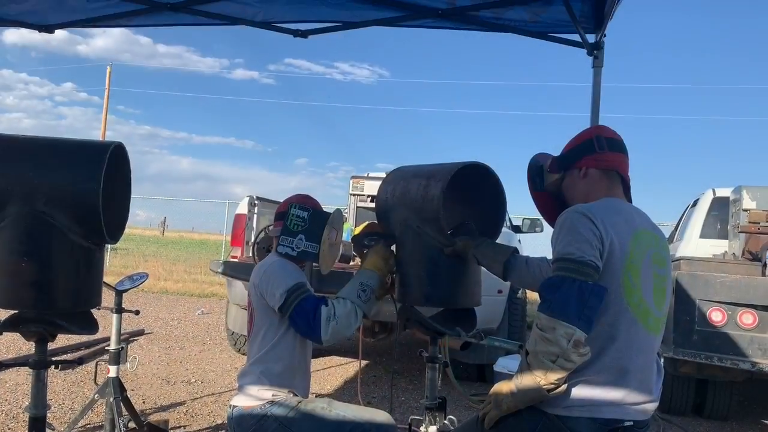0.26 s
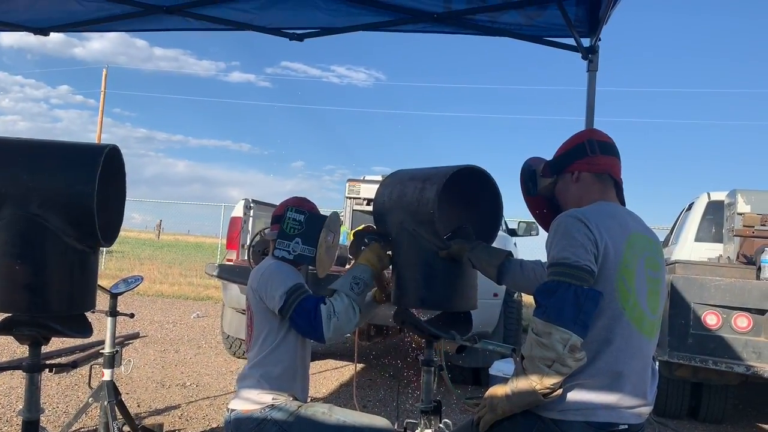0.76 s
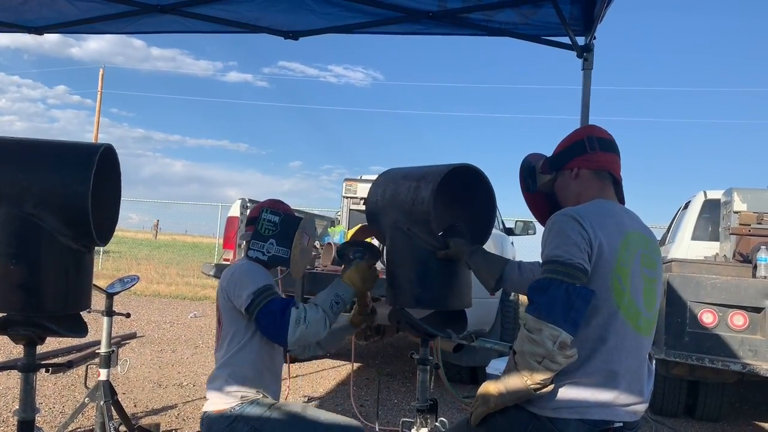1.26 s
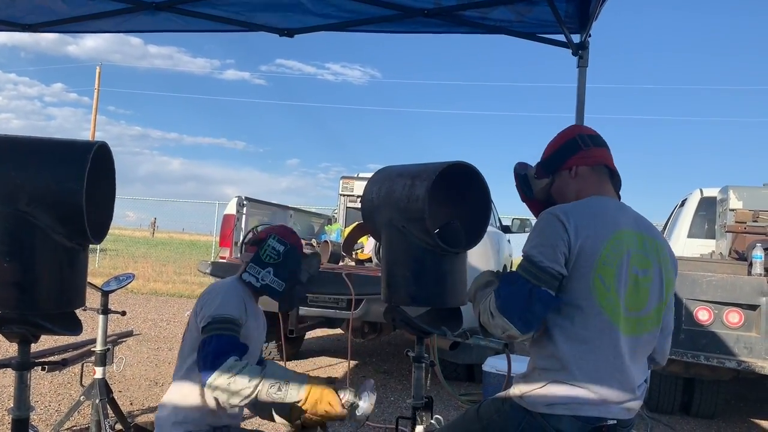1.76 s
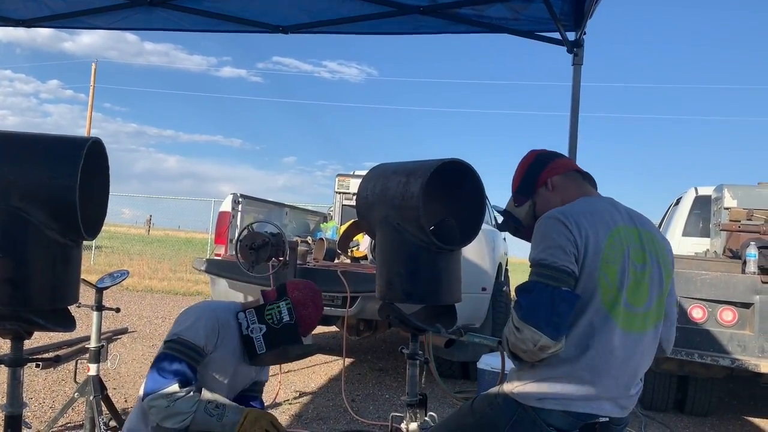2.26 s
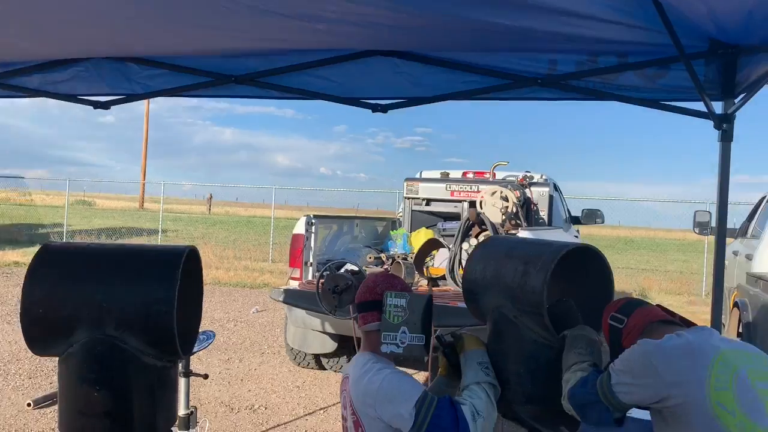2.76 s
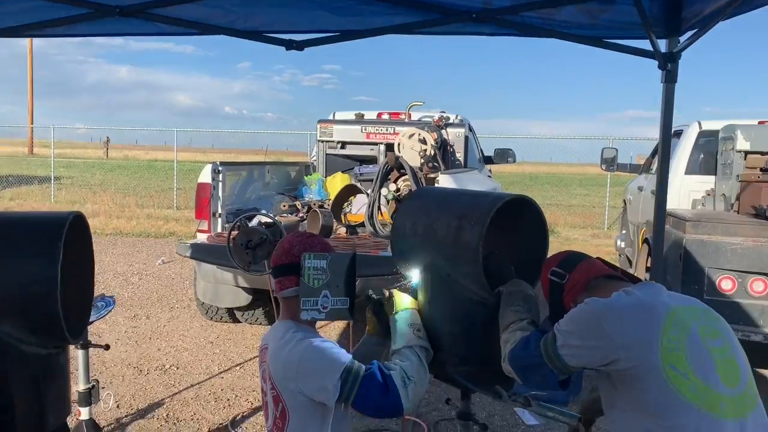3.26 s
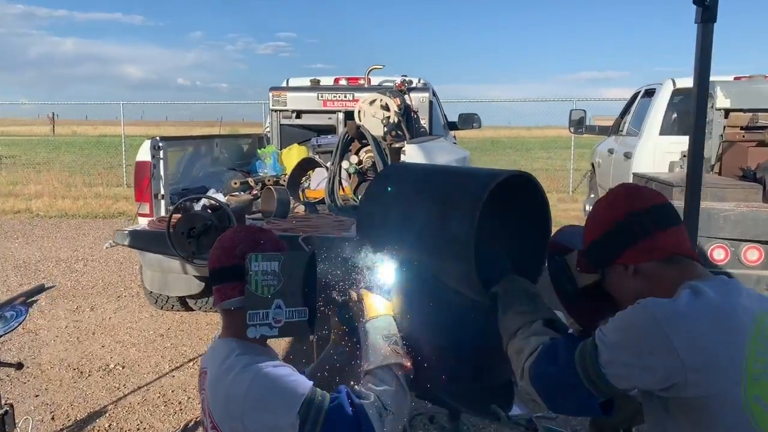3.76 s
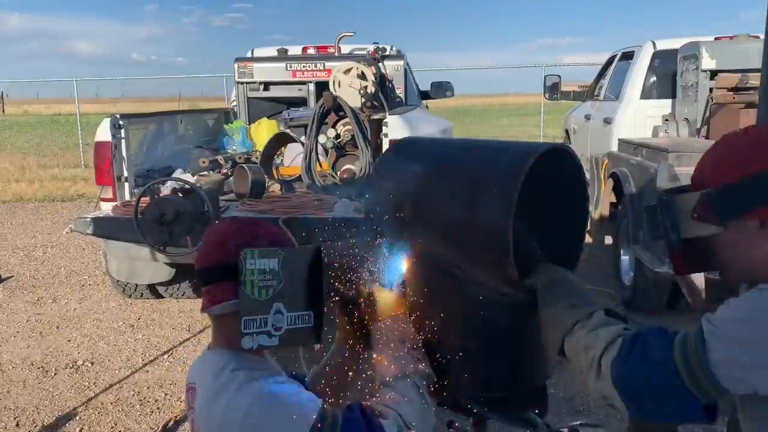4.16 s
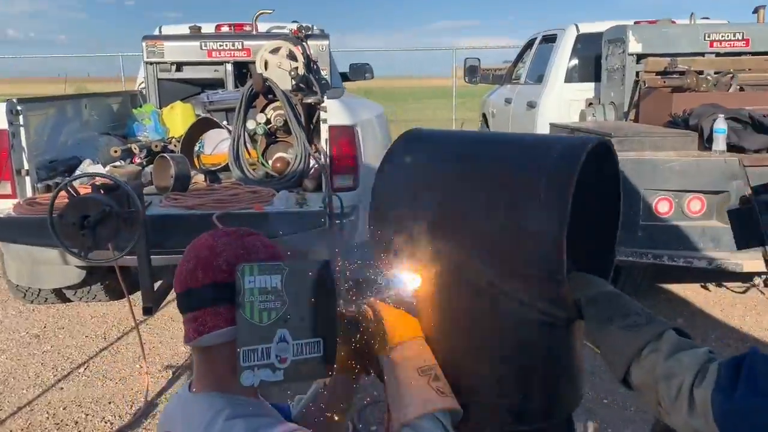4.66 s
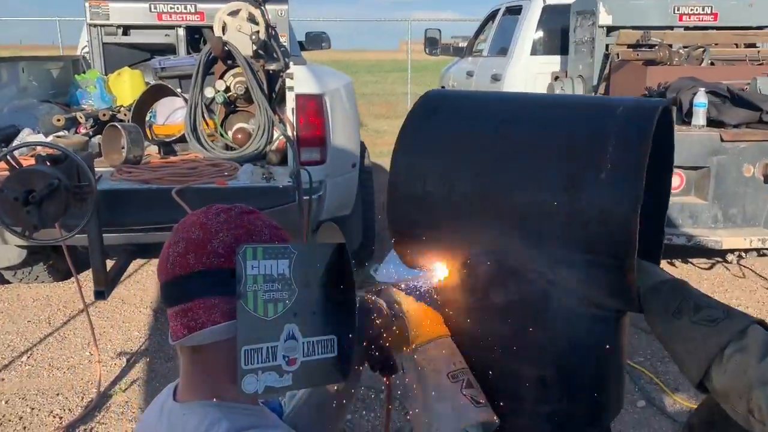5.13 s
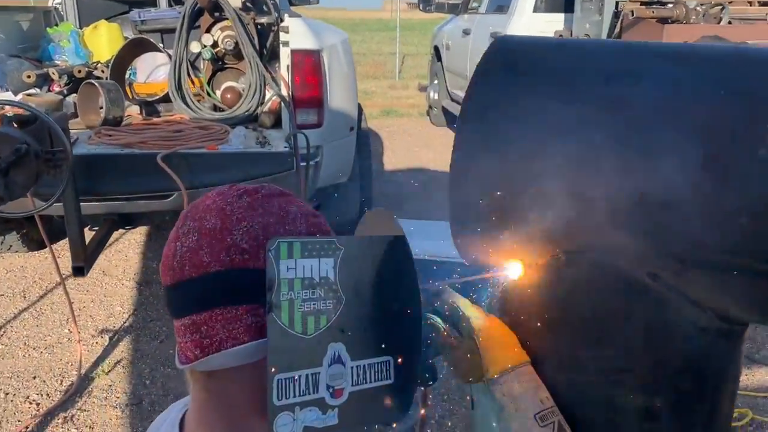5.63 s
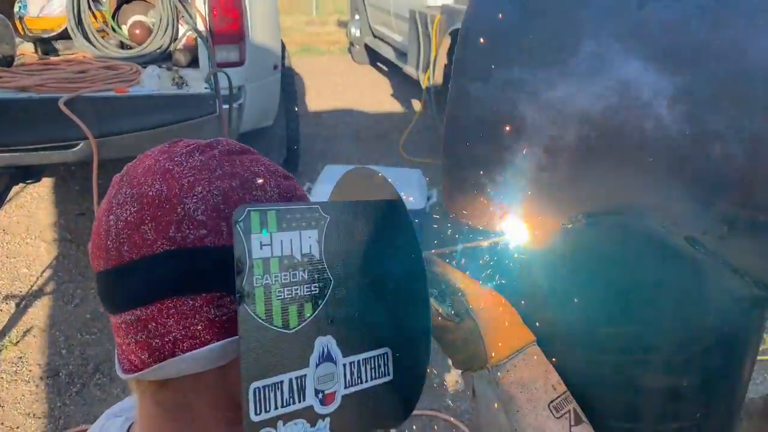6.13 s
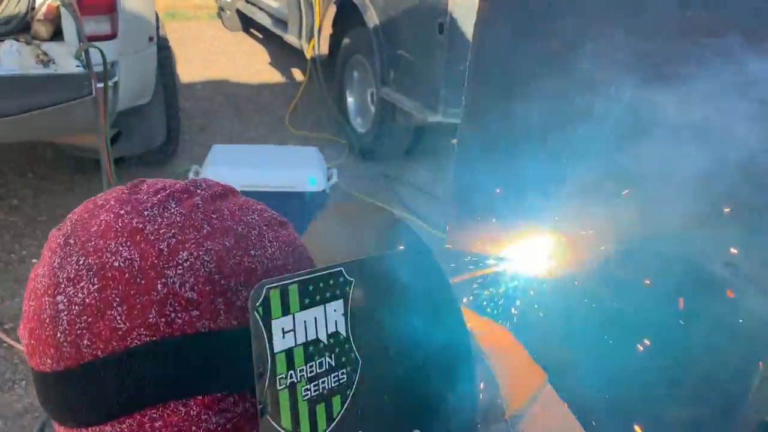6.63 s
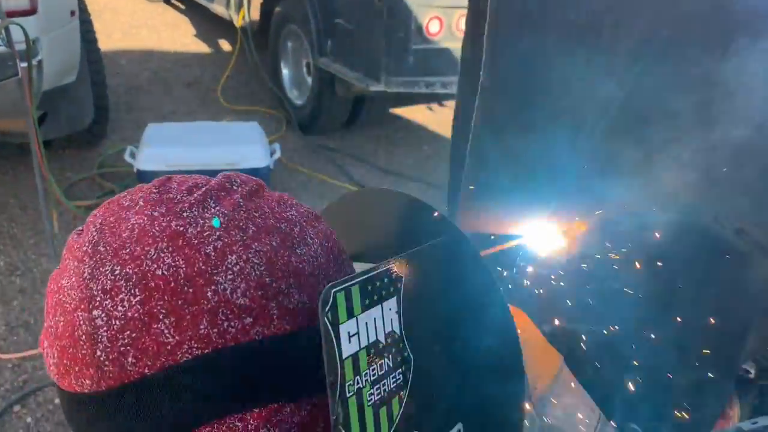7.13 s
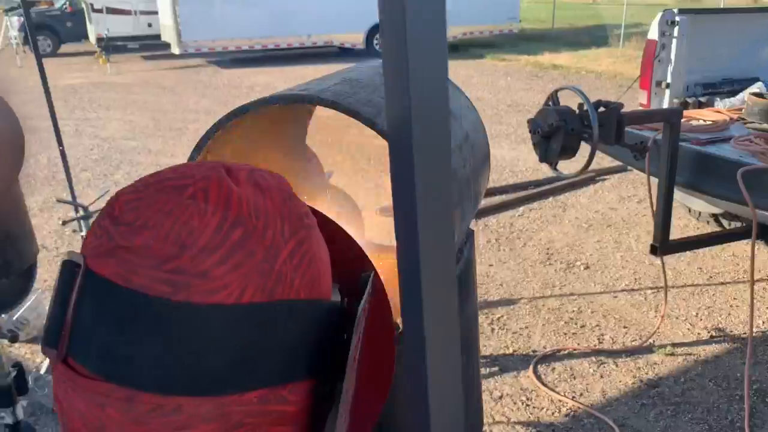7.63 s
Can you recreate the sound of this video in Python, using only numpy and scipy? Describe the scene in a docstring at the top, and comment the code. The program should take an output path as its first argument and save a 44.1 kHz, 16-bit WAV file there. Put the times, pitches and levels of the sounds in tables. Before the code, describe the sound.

Outdoors, a welder's engine drones steadily. A file is drawn once across a big steel pipe, scraping harder and making the metal ring. The rod holder knocks and scratches a few times, then an electric arc catches and the engine sags slightly under the load. The arc sizzles, crackles and spits to the end, growing louder and nearer, while gusts rumble and thump on the hand-held stereo microphones.

```python
"""Filing and welding a steel pipe

Outdoors, the three-cylinder engine of a welder drones while a file is drawn once across a big steel
pipe and makes it ring. The rod holder knocks, then an arc is struck. It sizzles and spits as drops of
metal short the gap, nearer and nearer, and wind buffets the hand-held pair of microphones."""
import sys
import numpy as np
from scipy import signal
from scipy.fft import rfft, irfft, next_fast_len
from scipy.io import wavfile
from scipy.ndimage import uniform_filter1d

SR = 44100
rng = np.random.default_rng(int(sys.argv[2]) if len(sys.argv) > 2 else 0)


def dump_mix(stems):
    """Bounce the given channels to the path in sys.argv[1] as a 16-bit WAV at rate SR."""
    frames = np.atleast_2d(stems).T  # one column per channel
    limited = np.clip(frames, -1, 1)  # hard clip at full scale
    pcm = np.round(limited * 32767).astype(np.int16)
    wavfile.write(sys.argv[1], SR, pcm)


N = 348063
SIZE = next_fast_len(N)
T, HZ = np.arange(N) / SR, np.fft.rfftfreq(SIZE, 1 / SR)

# The pipe wall's own notes: f/Hz, level/dB, t60/s (the time to fade by 60 dB)
PIPE_NOTES = [(334, -6, .1), (730, -12, .1), (810, -9, .15), (1082, -11, .3), (1168, -9, .13),
              (1444, -12, .9), (1502, -13, .25), (1652, -8, .35), (1726, -9, .15), (2278, -14, .06),
              (2433, -15, .2), (3445, -18, .7), (3688, -19, .6), (4396, -19, .08), (4850, -21, .66),
              (4877, -20, .5), (5642, -14, .08), (6056, -22, .7)]


def arc():
    """Hot gas hisses and flutters as drops of metal short the gap, over a steadier roar and frying."""
    onset = [(3.245, 0), (3.27, 0.85)]  # the arc catches: t/s, strength/0-1
    levels = [(3.27, -31.5, -28.5, -41), (3.45, -37.5, -28, -31.5), (3.75, -35, -26, -33),
              (3.9, -44, -34, -35), (4.1, -32.5, -24.5, -33.5), (4.3, -44.5, -32.5, -44),
              (4.5, -31, -28.5, -29.5), (4.8, -24.5, -25.5, -27), (5.1, -27, -27.5, -32.5),
              (5.45, -24.5, -28, -27), (5.7, -27.5, -25, -26), (5.9, -22.5, -23.5, -25),
              (6.45, -23.5, -17.5, -25.5), (6.65, -20.5, -18, -23.5), (7, -20, -17.5, -27.5),
              (7.6, -24, -19, -24), (7.72, -28.5, -28.5, -24), (7.89, -23, -20.5, -19)]  # it draws nearer: t/s, sizzle/dB, roar/dB, frying/dB
    shorts = [(3.668, 32, 0.025), (4.79, 0, 0.005), (4.84, 15, 0.017), (5.444, 2.5, 0.088),
              (5.829, 7, 0.016), (5.987, 5.5, 0.026), (6.599, 7.5, 0.0099), (6.92, 5, 0.014),
              (6.951, 18, 0.0054), (7.057, 3.5, 0.021), (7.155, 13, 0.018), (7.283, 11, 0.0041),
              (7.311, 6, 0.009), (7.348, 8, 0.01), (7.415, 15, 0.005), (7.52, 5, 0.037),
              (7.639, 3.5, 0.037), (7.845, 5.5, 0.044)]  # a drop bridges the gap and quiets the arc: t/s, depth/dB, length/s
    route = [(5.1, 0), (5.6, 1), (7.67, 1), (7.69, 2)]  # where it is heard from: t/s, place/0-2
    colours = [(300, 1.5), (600, -6), (1000, -5), (1500, -10), (2400, -16), (2800, -12.5), (3300, -9),
               (3900, -11.5), (5300, -6.5), (6200, -1), (8000, 3.5), (12500, 3.5), (15800, -3)], [(300, 2),
               (700, 1.5), (950, -0.5), (1300, 4), (2000, -14.5), (2700, -3.5), (3500, -5.5), (4000, -10.5),
               (5000, -0.5), (6800, -6), (8500, -0.5), (12000, -1), (15800, -3.5)], [(300, 4), (600, -16),
               (1000, -9), (1400, -7), (2000, -15.5), (2600, -6), (3200, -13), (4200, -9), (5500, -21),
               (7600, -22), (8100, -17.5), (12000, -20), (15800, -22)]  # its tone at each of the three places: f/Hz, level/dB
    gap_note = [(3.3, 3200, -51), (3.75, 3260, -36), (4.2, 3180, -43.5), (4.6, 3320, -31),
                (5.2, 3450, -34.5), (5.5, 3420, -54)]  # the gap between the pipes whistles: t/s, f/Hz, level/dB
    noise = rng.standard_normal((2, N))
    signs, place = np.sign(noise), curve(route)
    burning = curve(onset)
    for s, depth_db, length in shorts:
        burning = burning * gain_of(-depth_db * np.exp(-(2 * (T - s) / length) ** 4))
    drop_sizes = gain_of(5.9 * np.minimum(rng.exponential(1, N), 3.0))
    drops = drop_sizes * (rng.random(N) < 420 / SR)  # about 420 a second
    crackle = signal.oaconvolve(drops, gain_of(-60 * T[:900] / 0.0016))[:N]
    tick_share = np.interp(place, [0, 1], [0.15, 0.27])  # more dry ticks close up
    ticks = burning * tick_share * evened(np.minimum(drops, 7.0) * signs)
    flicker_db = 0.44 * wander(33.0)
    quick = burning * noise * evened(gain_of(flicker_db + 2.8 * wander(230.0)) + 0.43 * crackle)
    steady = burning * noise * evened(gain_of(0.63 * flicker_db + 2.1 * wander(50.0)) + 0.62 * crackle)
    high_spits, mid_spits = spitting(column=1) * signs, spitting(column=2) * signs
    sizzle = gain_of(curve(levels)) * (quick + ticks) + 0.6 * high_spits
    roar = gain_of(curve(levels, 2)) * (steady + ticks) + 0.85 * mid_spits
    frying = gain_of(curve(levels, 3)) * steady + 0.67 * mid_spits
    high, low = 1 / (1 + (4600 / (HZ + 1)) ** 8), 1 / (1 + (HZ / 1900) ** 8)
    middle = abs(1 - high - low)
    out = 0
    for k, colour in enumerate(colours):
        colour = [(120, -34)] + list(colour)  # little bass from so small a source
        share = np.clip(1 - abs(place - k), 0, 1)
        out += microphones(share * sizzle, high * band_gain(colour, 8240, 10750), place=k)
        out += microphones(share * roar, middle * band_gain(colour, 1900, 5330), place=k)
        out += microphones(share * frying, low * band_gain(colour, 350, 1320), place=k)
    gap_hz, far = curve(gap_note), np.clip(1 - place, 0, 1)
    whistle = gain_of(curve(gap_note, 2, silent=True)) * resonate(quick, gap_hz, width_hz=200)
    whistle += gain_of(-34.5) * far * resonate(mid_spits, gap_hz, width_hz=300)  # spits ring it too
    return shifting_colour(pipe_echo(out) + microphones(whistle, 1.0))


def spitting(column):
    """How strongly the arc spits in one band: each spit is a snap inside a small swell."""
    spits = [(3.2568, -32, -48), (3.2673, -28, -39), (3.2982, -14, -32), (3.3426, -15, -29),
             (3.3621, -17, -27), (3.3621, -9, -23), (3.4679, -20, -33), (3.4679, -14, -29),
             (3.5038, -20, -27), (3.6145, -17, -18), (3.6255, -15, -22), (3.6854, -16, -28),
             (3.6857, -13, -25), (3.7058, -23, -28), (3.725, -15.5, -23), (3.766, -9, -20),
             (3.855, -16, -27), (3.9109, -32, -23), (3.9737, -15, -26), (4.056, -18, -34),
             (4.1139, -11, -15), (4.1412, -7, -21), (4.2413, -9.5, -22), (4.3838, -18, -30),
             (4.4007, -12, -24), (4.4516, -11, -27), (4.5971, -16, -22), (4.6655, -9, -23),
             (4.7223, -10, -25), (4.8326, -2, -20), (4.9169, -12, -19), (5.0072, -9, -22.5),
             (5.0406, -10, -25), (5.08, -6, -26), (5.1658, -7, -21), (5.293, -11, -15), (5.3489, -17, -26),
             (5.3714, -8, -23), (5.3953, -10, -33), (5.4876, -4, -24), (5.5978, -15, -33),
             (5.6158, -6, -27), (5.7021, -10, -14), (5.7749, -5.5, -16), (5.8173, -15, -27),
             (5.8313, -9, -21), (5.8587, -5, -24), (5.8947, -17, -29), (6.0014, -11, -13),
             (6.4085, -12, -17), (6.5522, -9, -11), (6.61, -10, -15), (6.6215, -4, -24), (6.7492, -4, -23),
             (6.8849, -7, -22), (6.9383, -9, -22), (6.9602, -7, -13), (6.9862, -11, -15), (7.0121, -9, -20),
             (7.0376, -12, -7), (7.1493, -1, -23), (7.1693, -5, -19), (7.2366, -4, -9), (7.286, -6, -22),
             (7.2955, -7, -15), (7.3234, -12, -19), (7.3523, -2, -24), (7.3688, -11, -23),
             (7.3873, -3, -19), (7.4242, -11, -18), (7.5404, -6, -18), (7.5584, -10, -21),
             (7.5948, -2, -21), (7.6133, -7, -27), (7.6432, -2, -26), (7.7789, -13, -33)]  # t/s, treble peak/dB, middle peak/dB
    swell_db, swell_s = -24, 0.008
    events = [(row[0], row[column]) for row in spits]
    snaps = bursts([(s, db, 0.0065) for s, db in events], rise_s=0.0003)
    t = T[::64]
    swells = sum(gain_of(db + swell_db) * np.exp(-((t - s) / swell_s) ** 2) for s, db in events)
    return snaps + np.interp(T, t, swells)


def file_stroke():
    """The teeth scrape and catch on the steel, which sets both the file and the pipe ringing."""
    stroke = [(0, -32.5, 0.56, -46), (.25, -33, 0.5, -52), (.285, -28.5, 1, -45), (.37, -24.5, 1, -51),
              (.39, -20.5, 0.95, -51), (.432, -22.5, 1, -44), (.442, -15.5, 0.96, -50),
              (.578, -14, 0.84, -30), (.63, -13.5, 1, -34), (.69, -12, 0.64, -27.5),
              (.81, -15.5, 0.65, -20.5), (.92, -17, 0.38, -27.5), (.98, -26, 0.5, -27),
              (1.03, -38, 0.3, -39), (1.12, -46, 0.9, -78)]  # t/s, level/dB, pressure/0-1, shaking of the wall/dB
    tooth_catches = [(0.0295, -18), (0.053, -19), (0.079, -29), (0.0976, -23), (0.122, -14.5),
                     (0.1555, -24), (0.1889, -22), (0.2125, -19), (0.236, -15), (0.2588, -19), (0.271, -16),
                     (0.2823, -7), (0.297, -15), (0.343, -16), (0.379, 3), (0.397, 11), (0.4385, -11),
                     (0.4664, -10), (0.514, -12), (0.7132, -12), (0.808, -9), (0.841, 4)]  # t/s, relative peak/dB
    light_tone = [(1000, -18), (1950, 1), (2300, -1), (2700, -4), (3700, -7), (4400, -30), (6500, -29),
                  (10500, -14), (11400, -38), (15500, -36)]  # scraping with light pressure: f/Hz, level/dB
    heavy_tone = [(400, -60), (900, -14), (2300, -17.5), (4300, -3.5), (6200, -3), (9600, -7.5),
                  (11500, -12), (12300, -10), (15000, -20)]  # scraping with heavy pressure: f/Hz, level/dB
    # The file's own notes slide as its free length changes:
    # loudest at t/s, f/Hz, glide/(Hz a second), relative level/dB, time to fall by 7 dB/s
    file_notes = [(0.12, 3500, -100, -1, 0.2), (0.27, 3800, -100, -2.5, 0.25), (0.54, 3270, -400, -2, 0.11),
                  (0.64, 4100, -400, -17, 0.28), (0.42, 7000, 1000, -2, 0.18), (0.47, 8720, -900, 4, 0.16),
                  (0.63, 8490, -900, 2.5, 0.29), (0.31, 10600, -300, 4, 0.12),
                  (0.66, 10050, -500, -3.5, 0.2)]
    catches = bursts([(s, db, 0.028) for s, db in tooth_catches], rise_s=0.00087)
    grain = evened(gain_of(0.87 * wander(250.0)))
    grit = rng.standard_normal((2, N)) * grain
    level, pressure = gain_of(curve(stroke, silent=True) - 3.0), curve(stroke, 2)
    light = (1 - pressure) * (level + 0.056 * catches) * grit
    heavy = pressure * (level + 0.042 * catches) * grit
    scrape = microphones(light, band_gain(light_tone, 1900, 11300))
    scrape += microphones(heavy, band_gain(heavy_tone, 3000, 6700))
    flutter = 0.77 * evened(gain_of(4.2 * wander(41.0))) + 0.49 * np.minimum(catches / level, 4)
    song = 0
    for s, hz, glide, db, reach in file_notes:
        pitch = hz + glide * np.clip(T - s, -reach, reach)
        song += level * gain_of(db - 7 * ((T - s) / reach) ** 2) * resonate(grit, pitch, width_hz=260)
    shaking = gain_of(curve(stroke, 3, silent=True)) * grit[0]
    low_ring = pipe_wall(shaking, [note for note in PIPE_NOTES if note[0] < 2000])
    high_ring = pipe_wall(pressure * level * grit[0], [note for note in PIPE_NOTES if note[0] > 2000])
    ring = low_ring + gain_of(-3.0) * high_ring
    ring_pair = gain_of(7.0) * np.array([ring, np.roll(ring, 300)])
    blade = sum(np.sin(2 * np.pi * (hz * T + rng.random())) for hz in (3490, 3650, 3830))
    ping = np.minimum(catches, gain_of(-17)) * blade  # each catch rings the blade
    return shifting_colour(scrape + microphones(flutter * song + 0.7 * ping + ring_pair, 0.61))


def pipe_wall(shaking, notes):
    """Shaken steel rings on at its own notes, each fading at its own speed."""
    t = T[:SR]
    ring = sum(gain_of(db - 60 * t / t60) * np.sin(2 * np.pi * hz * t) / np.sqrt(t60)
               for hz, db, t60 in notes)
    return signal.oaconvolve(shaking, ring)[:N] / np.linalg.norm(ring)


def chatter():
    """The teeth lock on to a note of the pipe: it rises quickly, holds and rings away."""
    tones = [(0.552, 0.033, 810, -26), (0.575, .03, 1710, -30), (0.672, 0.11, 810, -19.5),
             (0.715, 0.17, 1175, -24.5), (0.725, .03, 1726, -29), (0.85, .04, 830, -25.5),
             (0.93, 0.082, 813, -23.5), (0.935, .035, 1657, -32), (0.95, .03, 3445, -38),
             (0.89, .09, 4850, -43), (0.89, .09, 4877, -41)]  # t/s, length/s, f/Hz, level/dB
    rise_s, out = 0.01, 0
    for s, length, hz, db in tones:
        t = np.maximum(T - s, 0)
        t60 = min(PIPE_NOTES, key=lambda note: abs(note[0] - hz))[2]
        level = np.minimum(t / rise_s, 1) * gain_of(db - 60 * np.maximum(t - length, 0) / t60)
        out += level * np.sin(2 * np.pi * hz * t)
    return np.sqrt(2) * out * gain_of(2.3 * wander(60.0))  # the scraping roughens the tones


def knocks():
    """The rod holder knocks and scratches the pipe: short noises, some dull, some bright."""
    hits = [(1.7494, -43, 0.036, 7), (2.3617, -21, 0.12, -3), (2.672, -19, 0.061, -4),
            (2.682, -15.5, 0.042, -8), (2.693, -23.5, 0.084, -5), (2.7766, -26.5, 0.17, -1.5),
            (2.802, -20, 0.044, 0.5)]  # t/s, relative peak/dB, t60/s, tilt toward treble/dB
    out = 0
    for s, db, t60, tilt in hits:
        noise = 1.23 * bursts([(s, db, t60)], rise_s=0.0046) * rng.standard_normal((2, N))
        colour = [(300, 6), (1000, -2 * tilt), (3000, -0.3 * tilt), (3800, 4.0), (4600, 0),
                  (10500, 2.3 * tilt), (16000, 2 * tilt - 13)]
        out += microphones(noise, gain_of(spectrum(colour)))
    return out


def engine():
    """Three firings a cycle make a slightly unsteady drone and shake noise out of the casing."""
    speed = [(3.25, 15.05), (3.6, 14.6), (4.6, 14.8), (6, 14.76), (7.67, 14.76), (7.7, 14.82)]  # the load drags the engine down: t/s, cycle rate/Hz
    welding_load = [(3.3, 0.01), (3.7, 0.94)]  # t/s, load/0-1
    free_tones = [(2, -20), (3, 0), (4, -17), (5, -20), (6, -15), (7, -14), (8, -18), (9, -8), (10, -10),
                  (11, -11), (12, -14), (13, -22), (14, -24), (15, -9), (16, -16), (17, -26), (18, -34),
                  (19, -34), (20, -30), (21, -27), (22, -25), (23, -26), (24, -20), (25, -24), (29, -29),
                  (30, -21), (31, -28), (32, -27), (33, -16), (34, -28), (35, -34), (36, -32), (40, -34),
                  (41, -29), (42, -22), (43, -30), (44, -27), (45, -30), (47, -33), (48, -31), (50, -31),
                  (52, -32), (54, -33), (61, -36), (66, -28), (69, -30), (71, -30)]  # running free: multiple of the cycle rate, level/dB
    loaded_tones = [(2, -5), (3, 2), (4, -4.0), (5, -27), (6, -6.5), (7, -17.0), (8, -11.0), (9, -38),
                    (10, -13.0), (11, -29), (12, -5.0), (13, -9.0), (14, -17.0), (15, -5.0), (16, -15.0),
                    (17, -11.5), (18, -30), (33, -16), (42, -10.0)]  # under load: multiple of the cycle rate, level/dB
    levels = [(0, -26.5, -30), (.6, -27, -31.5), (1.2, -26, -29.5), (2.57, -21.5, -26), (2.83, -24, -25),
              (3.21, -20.5, -22.5), (3.41, -31, -22.5), (4.6, -31, -24), (5.03, -28, -24.5),
              (5.45, -29, -26), (6.04, -27, -26), (6.77, -25, -24), (7.58, -28, -28), (7.89, -24, -32)]  # t/s, drone/dB, casing noise/dB
    clatter = [(25, -3.5), (60, 0.5), (150, -6), (280, -17.5), (500, -22), (740, -20.5), (880, -37),
               (1000, -24.5), (1400, -29.5), (2000, -27), (2400, -31.5), (2750, -35.5), (3100, -34.5),
               (5500, -37), (7000, -41), (11000, -44), (15500, -56)]  # fan and casing noise: f/Hz, level/dB
    panel_notes = [(994, 86, 2), (1460, 44, 11.5), (1694, 50, 9), (2430, 55, 10.5), (3300, 19, 6.5)]  # panels ring with each firing: f/Hz, width/Hz, level/dB
    cycles = np.cumsum(curve(speed) * (1 + 0.0012 * wander(1.73))) / SR
    step = 8  # low tones need only every eighth sample
    load, tones = curve(welding_load)[::step], 0
    for k, free_db in free_tones:
        wobble_db = 1.12 * np.sin(2 * np.pi * (rng.uniform(0.391, 4.0) * T[::step] + rng.random()))
        loaded_db = dict(loaded_tones).get(k, -30)
        level = gain_of(free_db + load * (loaded_db - free_db) + wobble_db)
        tones += level * np.cos(2 * np.pi * (k * cycles[::step] + rng.random()) + 0.5 * wobble_db)
    drone = np.sqrt(2) * gain_of(curve(levels)) * signal.resample_poly(tones, up=step, down=1)[:N]
    throb = 1 + 0.021 * np.cos(2 * np.pi * cycles) + 0.096 * np.cos(2 * np.pi * 3 * cycles)
    casing = evened(microphones(throb * rng.standard_normal((2, N)), gain_of(spectrum(clatter))))
    firings = np.exp(-(3 * cycles % 1) / 0.33) * throb * rng.standard_normal((2, N))
    panel_gain = sum(gain_of(db) / (1 + (2 * (HZ - hz) / width) ** 2) for hz, width, db in panel_notes)
    panels = gain_of(-19.5) * evened(microphones(firings, panel_gain))
    return drone + gain_of(curve(levels, 2)) * (casing + panels)


def wind():
    """Swirling air rumbles on the microphones, and single gusts land as thumps that fall in pitch."""
    strength = [(2.76, -33, -13), (2.82, -29, -14), (2.92, -42, 11), (3.3, -28.5, -10), (3.5, -18, -30),
                (3.6, -24, -34), (3.79, -19.5, 1.5), (4.02, -19.5, -26), (4.13, -16.5, 0), (4.47, -24, -16),
                (4.6, -18.5, -11), (4.8, -22.5, -2), (5.06, -15.5, -3.5), (5.43, -25, -6),
                (5.77, -19.5, 1.5), (5.9, -28, 5.5), (7.45, -33.5, 13), (7.55, -12, -7), (7.7, -54, 10),
                (7.89, -39, 8)]  # t/s, level/dB, extra level for the rush/dB
    rumble_tone = [(25, -8), (45, 9.5), (90, 4), (140, -7.5), (300, -24.5)]  # deep buffeting: f/Hz, level/dB
    rush_tone = [(80, -37), (160, -2.5), (300, -12), (600, -11), (1200, -55)]  # the higher rush of air: f/Hz, level/dB
    thumps = [(3.11, -5, 137, 0.06), (3.247, -11, 140, 0.037), (3.302, -4, 137, 0.027),
              (3.767, -17, 220, 0.022), (3.79, 4.5, 159, 0.013), (3.808, -5, 110, 0.029),
              (3.952, -8, 227, 0.05), (4.002, -10, 234, 0.042), (4.116, -7, 177, 0.02),
              (4.147, 9.5, 102, 0.0077), (4.168, 6, 115, 0.013), (5.249, 11, 192, 0.012),
              (5.677, -10, 183, 0.11), (5.749, -4.5, 194, 0.027), (5.913, -5.5, 170, 0.039),
              (7.514, -11.5, 194, 0.086), (7.61, -4, 172, 0.024)]  # t/s, relative peak/dB, final f/Hz, t60/s
    lumps = rng.standard_normal((2, N)) * evened(gain_of(6.1 * np.minimum(wander(13.0), 1.2)))
    lumps *= gain_of(curve(strength, silent=True))
    out = microphones(lumps, 0.67 * band_gain(rumble_tone, 49, 170))
    out += microphones(lumps * gain_of(curve(strength, 2)), 0.45 * band_gain(rush_tone, 100, 700))
    for s, db, hz, t60 in thumps:
        t = np.maximum(T - s, 0)
        phase = 2 * np.pi * hz * (t + 0.0025 * (1 - np.exp(-t / 0.0036)))
        out -= 1.04 * bursts([(s, db, t60)], rise_s=0.0017) * np.cos(phase)
    return out


def loose_panel():
    """A loose panel pings three times, one engine cycle apart."""
    pings = [(2.835, -30), (2.901, -30), (2.967, -34)]  # t/s, peak/dB
    hz, t60 = 1440, 0.077
    return bursts([(s, db, t60) for s, db in pings], rise_s=0.0019) * np.sin(2 * np.pi * hz * T)


def hum():
    """A low tone swells briefly around the moment the arc is struck."""
    tone = [(2.78, 240, -32), (3.1, 239, -31), (3.25, 241.5, -23), (3.4, 232, -42)]  # t/s, f/Hz, level/dB
    phase = 2 * np.pi * np.cumsum(curve(tone)) / SR
    return np.sqrt(2) * gain_of(curve(tone, 2, silent=True)) * np.sin(phase)


def pipe_echo(x):
    """Adds an echo off the pipe wall, whose path shifts as the microphones move."""
    delays = [(3.3, 1.76), (4, 1.07), (5, 1.46), (5.5, 1.73), (6.3, 1.84), (6.6, 1.66), (7, 1.71),
              (7.89, 1.13)]  # t/s, delay/ms
    samples = np.arange(N)
    late = samples - curve(delays) * SR / 1000
    return x + gain_of(-11) * np.array([np.interp(late, samples, side) for side in x])


def shifting_colour(x, depth_db=2.5):
    """Narrow bands of pitch drift louder and softer at random, giving a hollow, shifting colour."""
    bands = signal.stft(x, nperseg=512)[2]
    streaks = uniform_filter1d(rng.standard_normal(bands.shape[1:]), size=2, axis=0)
    streaks = uniform_filter1d(streaks, size=60, axis=1)
    return signal.istft(bands * gain_of(depth_db * evened(streaks)), nperseg=512)[1][:, :N]


def microphones(source, gain, place=0):
    """Of two versions of a sound, the left hears the first; the right, a phase-shifted blend of both."""
    likeness = [(40, 0.83), (300, 0.94), (1350, 0.84), (1600, 0.12), (2250, 0.63), (2550, 0.66),
                (3900, 0.88), (5000, 0.48), (5900, 0.32), (7200, 0.57), (7800, 0.75), (8800, 0.83),
                (10300, 1), (11400, 1), (12600, 1), (13600, 0.97), (14800, 0.9), (16000, 1)]  # how alike the two sides are: f/Hz, likeness/0-1
    balance = [(60, 0.0), (110, 0.0), (200, 0.0), (380, 0.5), (700, 1.0), (1290, 4.0), (2380, 0.5),
               (4400, -1.0), (8120, -0.5), (15000, 0.0)]  # f/Hz, left minus right/dB
    leads = [(0, 0), (1290, -0.0), (1810, -2.5), (2580, 0.5), (3790, 0.4), (5430, 4.1), (6630, 8.7),
             (7410, 9.6), (8270, 7.3), (11600, 2.9), (13200, 0.3), (14000, -0.1), (15300, -2.8),
             (16100, -3.2)], [(0, 0), (1380, -0.3), (1640, -2.4), (1980, -1.9), (2500, 3.4), (3190, 5.9),
             (4650, 7.3), (5340, 8.9), (5940, 6.4), (7240, 9.7), (8350, 7.1), (9560, 5.8), (13200, 0.5),
             (16100, -3.5)], [(0, 0), (1290, -0.1), (1890, 8.1), (2240, 5.7), (2840, 8.6), (4050, 8.5),
             (4570, 11.6), (5000, 9.2), (6980, 15.3), (7490, 15.9), (8180, 19.8), (9560, 18.4),
             (15400, 9.9), (16100, 9.5)]  # how far the left is ahead at each place: f/Hz, phase/radians
    first, second = rfft(source, SIZE) * gain
    same, tilt = spectrum(likeness), gain_of(spectrum(balance) / 2)
    turn = np.exp(1j * np.interp(HZ, *np.transpose(leads[place])))
    right = same * first / turn + np.sqrt(1 - same ** 2) * second
    return irfft([first * tilt, right / tilt])[:, :N]


def resonate(x, hz, width_hz):
    """Rings a sound at a moving pitch: shifts that pitch down to zero, smooths, and shifts back."""
    turn = np.exp(2j * np.pi * np.cumsum(hz) / SR)
    decay = np.exp(-np.pi * width_hz / SR)
    return evened((turn * signal.lfilter([1 - decay], [1, -decay], x / turn)).real)


def bursts(rows, rise_s):
    """The strength over time of events (t/s, level/dB, t60/s) that rise quickly and die away."""
    out = np.zeros(N)
    for s, db, t60 in rows:
        part = out[round(s * SR):][:SR // 4]
        t = T[:len(part)]
        part += gain_of(db - 60 * t / t60) * (1 - np.exp(-t / rise_s))
    return out


def wander(rate_hz):
    """A smooth random drift, mostly slower than the given rate."""
    return evened(irfft(rfft(rng.standard_normal(SIZE)) / (1 + (HZ / rate_hz) ** 2))[:N])


def curve(rows, column=1, silent=False):
    """One column of a table over time; silent gives -120 dB before and after the table."""
    rows = np.asarray(rows)
    outside = -120 if silent else None
    return np.interp(T, rows[:, 0], rows[:, column], outside, outside)


def spectrum(points):
    """Joins (f/Hz, value) points with lines, giving each octave equal room."""
    hz, value = np.transpose(points)
    return np.interp(np.log(HZ + 1), np.log(hz + 1), value)


def band_gain(colour, lo_hz, hi_hz):
    """Gains for a tone colour, scaled so that white noise comes out with rms 1 in the band."""
    gain = gain_of(spectrum(colour))
    return gain / np.sqrt(np.mean(gain ** 2 * (HZ > lo_hz) * (HZ < hi_hz)))


def gain_of(db):
    """Turns decibels into a number to multiply by."""
    return 10 ** (np.asarray(db) / 20)


def evened(x):
    """Scales a signal to an average strength (rms) of 1."""
    return x / np.sqrt(np.mean(x ** 2) + 1e-20)


def scene():
    """All the sources together at the two microphones."""
    return engine() + hum() + loose_panel() + file_stroke() + chatter() + knocks() + arc() + wind()


def record(dry):
    """The level dips briefly twice, loud peaks are rounded off, and the highest treble is cut."""
    dips = [(2.745, 0.03), (7.681, 0.025)]  # t/s, half length/s
    for s, half in dips:
        dry = dry * np.sin(np.pi / 2 * np.clip(abs(T - s) / half, 0.24, 1)) ** 2
    rounded = 1.171 * np.tanh(dry / 1.468)
    treble_cut = signal.firwin(511, 15950, window=("kaiser", 9), fs=SR)
    return signal.oaconvolve(rounded, treble_cut[None], "same")


dry = scene()
out = record(dry)
dump_mix(out)
```